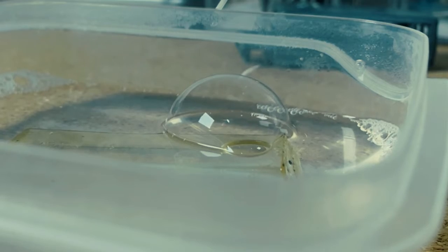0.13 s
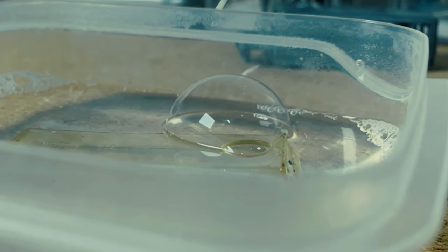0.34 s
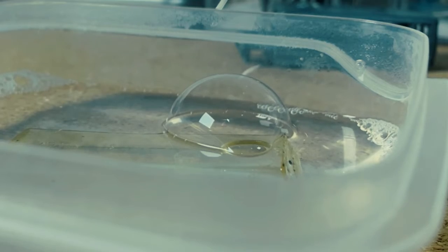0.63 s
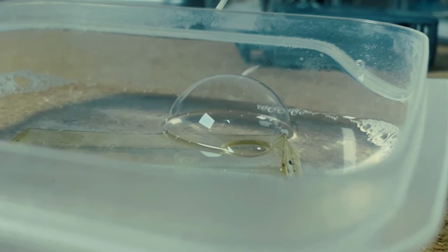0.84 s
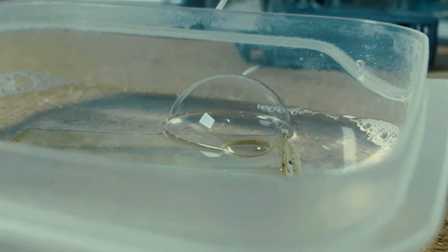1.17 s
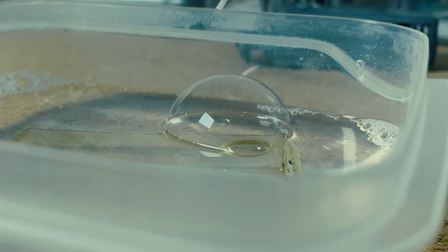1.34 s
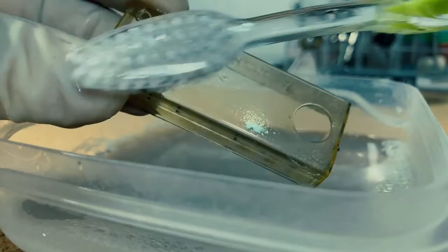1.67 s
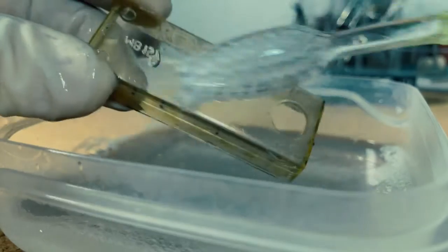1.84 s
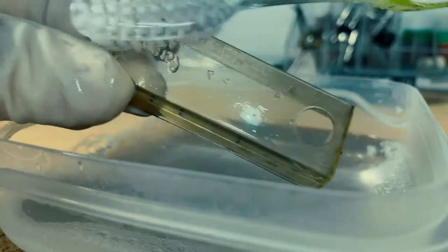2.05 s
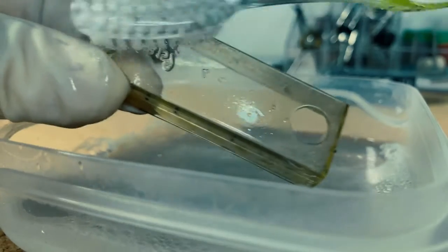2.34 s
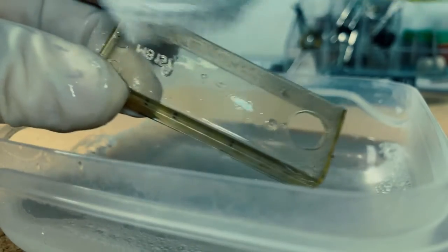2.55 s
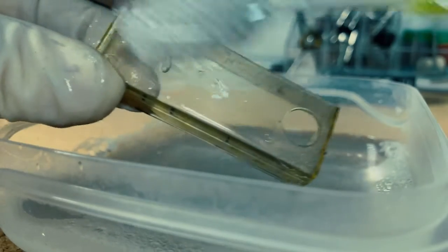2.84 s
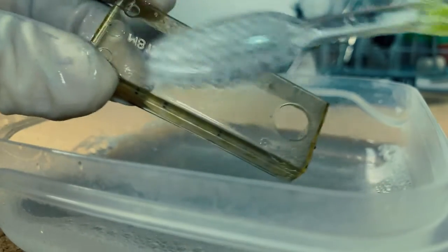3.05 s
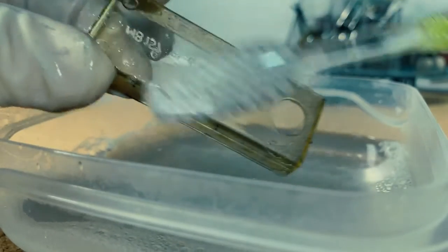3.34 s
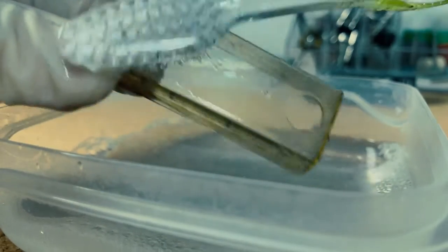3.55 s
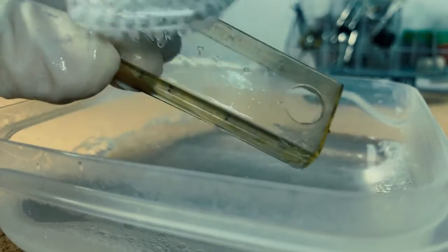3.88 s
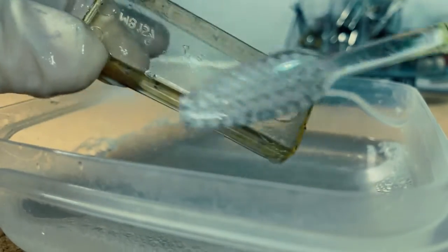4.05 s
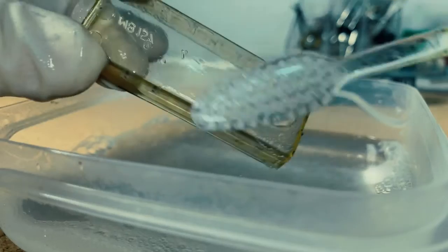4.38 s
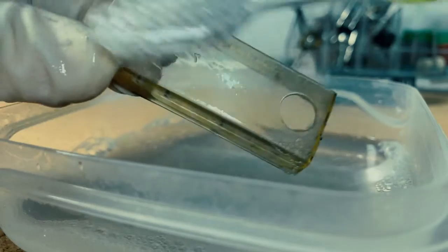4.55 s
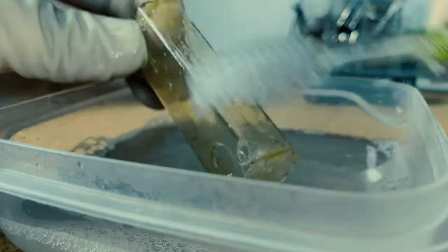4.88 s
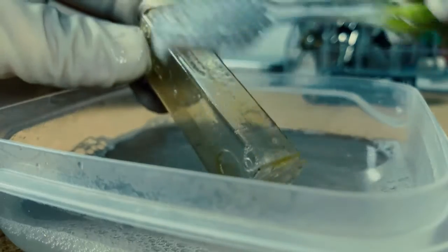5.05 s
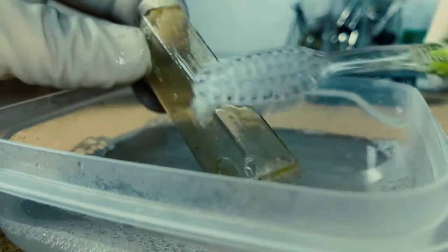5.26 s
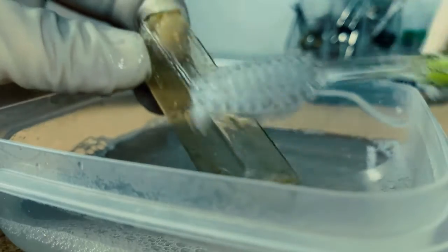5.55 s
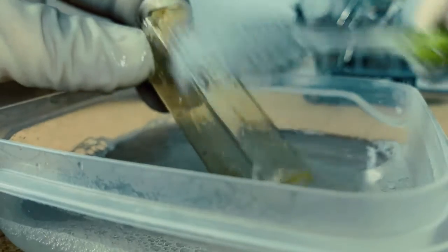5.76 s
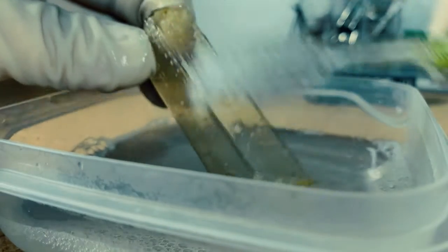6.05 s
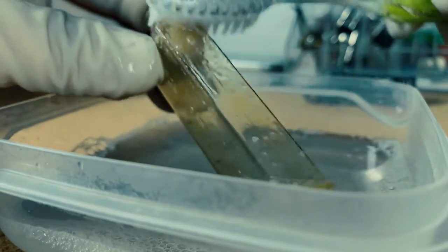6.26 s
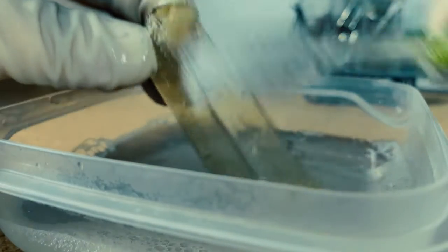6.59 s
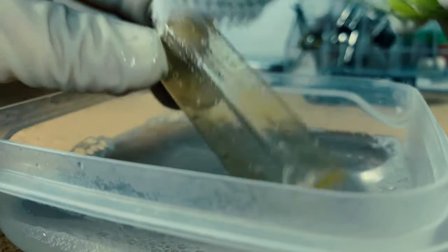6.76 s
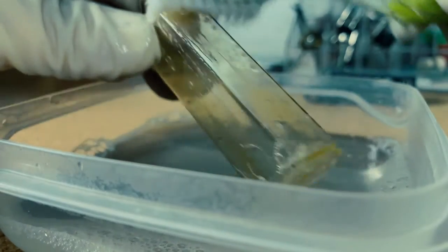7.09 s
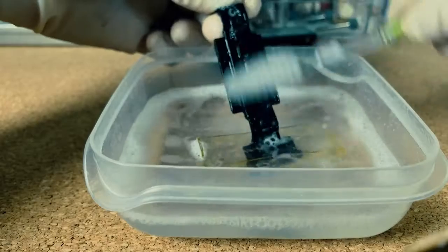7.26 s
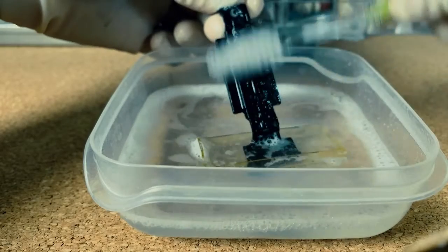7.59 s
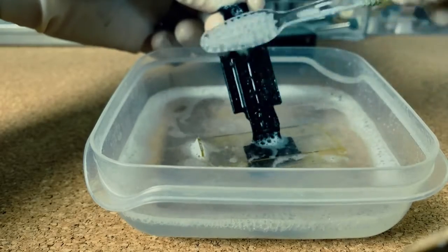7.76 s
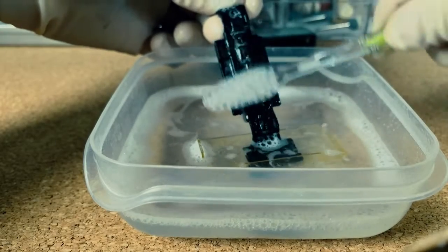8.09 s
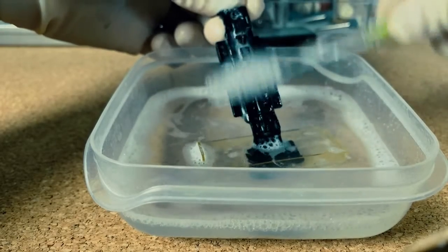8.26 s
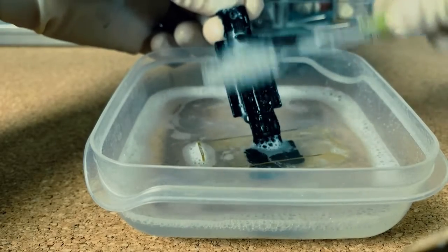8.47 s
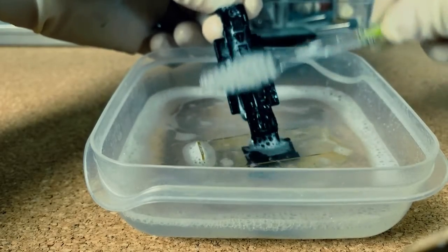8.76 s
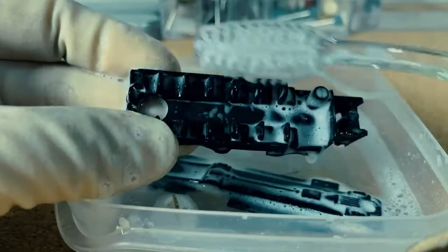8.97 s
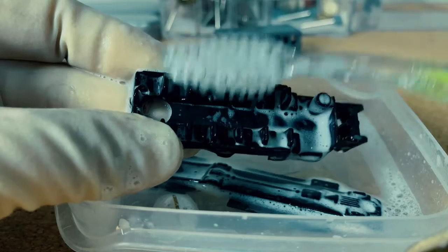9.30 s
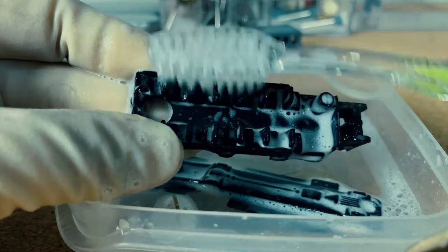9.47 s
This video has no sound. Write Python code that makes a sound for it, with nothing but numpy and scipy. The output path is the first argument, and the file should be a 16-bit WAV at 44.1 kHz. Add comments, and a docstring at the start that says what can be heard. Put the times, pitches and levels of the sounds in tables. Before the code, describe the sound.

From 0 to 1.7 s there is only a quiet low room hum, slight hiss and faint plastic stirs, close to a tub on a table. At 1.7 s a wet toothbrush lands on soapy plastic and scrubs in quick alternating strokes, about six or seven a second, a bright grainy hiss with a fizz of foam. Small plastic judders and low tub and table rumble accompany it, with a sharp snap near 4.1 s and a click around 4.6 s. From 4.9 s, on a narrow edge, strokes are louder, crisper and clearly separated, with snaps near 5.5, 6 and 6.9 s. From 7.3 s they become shorter, quicker and softer on a black part, alternating in strength. Around 8.85 s a knock marks the brush lifting; a brief gap follows. From 9.1 s slower, peaked strokes pick over ribs, with a snap at 9.4 s.

```python
"""Quiet room, the microphone close to a tub of water on a table. A low hum and faint stirs come first.
At 1.7 s a toothbrush lands on a soapy clear plastic part: flat face, then narrow edge from 4.9 s, then a black part
from 7.3 s. It lifts at 8.9 s, and from 9.1 s picks slowly at the black ribs. Each stroke is a swarm of flicking wet
bristles, filtered by the surface. Tufts snap over edges, the part judders on the tub, and tub and table shake below.
Left and right differ in phase and likeness from band to band, as in a widened stereo image."""
import sys
import numpy as np
from scipy import signal
from scipy.fft import rfft, irfft, next_fast_len
from scipy.io import wavfile
from scipy.ndimage import uniform_filter1d

SR = 44100
rng = np.random.default_rng(int(sys.argv[2]) if len(sys.argv) > 2 else 0)


def dump(signal):
    """Clip the signal to [-1, 1] and save it as 16-bit WAV at the path in sys.argv[1]."""
    limited = np.clip(np.atleast_2d(signal).T, -1, 1)
    pcm = np.round(limited * 32767).astype(np.int16)
    wavfile.write(sys.argv[1], SR, pcm)


N = 424683
EDGE_HZ = 15800  # upper limit of the sound
LAND_S, LIFT_S, RETURN_S = 1.664, 8.912, 9.143  # the brush touches down, lifts off and touches down again
SIZE = next_fast_len(N + SR // 4)  # padded, so that filtering does not wrap around
TIME, BINS = np.arange(N) / SR, np.fft.rfftfreq(SIZE, 1 / SR)


def gain_of(db):
    """Decibels to amplitude factor."""
    return 10 ** (np.asarray(db) / 20)


def evened(x):
    """Scales to unit RMS."""
    return x / np.sqrt(np.mean(x ** 2) + 1e-20)


def read(points, hz):
    """Reads a spectrum table, interpolating along log frequency."""
    f, value = np.transpose(points)
    return np.interp(np.log(hz + 1), np.log(f + 1), value)


def add(mix, s, sound):
    """Adds a sound to the mix from s seconds on, cut at the end of the mix."""
    part = mix[:, round(s * SR):][:, :sound.shape[1]]
    part += sound[:, :part.shape[1]]


def spectrum_of(x):
    """Sound to padded spectrum."""
    return rfft(x, SIZE)


def sound_of(z):
    """Spectrum back to sound."""
    return irfft(z, SIZE)[..., :N]


def wander(rate_hz):
    """Smooth random curve of unit RMS, with little change faster than rate_hz."""
    return evened(sound_of(spectrum_of(rng.standard_normal(N)) / (1 + (BINS / rate_hz) ** 4)))


def coloured(points):
    """Two unrelated noises with the given spectrum, at unit RMS."""
    return evened(sound_of(spectrum_of(rng.standard_normal((2, N))) * gain_of(read(points, BINS))))


def echoes(x, t60, db):
    """Adds a dense train of dying reflections, roughly keeping the power."""
    t = np.arange(SR // 3) / SR
    tail = rng.standard_normal(len(t)) * gain_of(-60 * t / t60) * (t > .001)
    wet = signal.oaconvolve(x, tail[None] / np.linalg.norm(tail), axes=1)[:, :N]
    return (x + gain_of(db) * wet) / np.hypot(1, gain_of(db))


# Colour of the faint hiss. Each row: frequency in Hz, relative level in dB per Hz.
AIR_COLOUR = [(200, -10), (700, 4.5), (1400, -2.5), (2500, -5.5), (5000, -8.5), (9000, -18.5),
              (12000, -4.5), (15500, -17)]


def air(air_db=-81):
    """Faint steady hiss, unrelated between left and right."""
    return gain_of(air_db) * coloured(AIR_COLOUR)


# Colour of the quiet room. Each row: frequency in Hz, relative level in dB per Hz.
HUM_COLOUR = [(20, -21.5), (40, -6.5), (52, 6), (68, -6.5), (86, -21.5), (118, -0.5), (160, -4), (220, -15),
              (450, -28.5), (1000, -47.5)]


def room(hum_db=-61, swell_db=1.5, swell_hz=6):
    """A low hum, noise in narrow humps, that swells and sinks at random."""
    return gain_of(hum_db + swell_db * wander(swell_hz)) * coloured(HUM_COLOUR)


def rumble(curve, spectrum, offset_db):
    """Low coloured noise that follows a level curve and sets in when the brush lands."""
    onset = np.clip((TIME - LAND_S) / 0.021, 0, 1)
    return gain_of(offset_db + np.interp(TIME, *np.transpose(curve))) * onset * coloured(spectrum)


# Deep heave of the table under the arm. Each row: time in seconds, level in dB before jolts and unsteadiness.
HEAVE = [(1.7, -60), (2.38, -44), (2.51, -50), (3.31, -43), (4.57, -51.5), (4.74, -40.5), (4.85, -56.5),
         (5.96, -48.5), (7.77, -61.5), (9.62, -58.5)]
# Colour of the table. Each row: frequency in Hz, relative level in dB per Hz.
TABLE_COLOUR = [(15, -33), (25, -17), (40, -4), (52, 3.5), (66, -5), (90, -11.5), (200, -40.5)]
# Shaking of the tub under the hands. Each row: time in seconds, level in dB before drag and unsteadiness.
SHAKE = [(1.7, -49), (1.72, -47.5), (4.72, -47), (4.94, -51), (6.59, -50), (8.78, -54.5), (8.87, -44.5),
         (8.94, -57), (9.62, -53)]
# Colour of the tub. Each row: frequency in Hz, relative level in dB per Hz.
TUB_COLOUR = [(50, -22.5), (85, -6.5), (105, -8.5), (120, 2), (132, -4.5), (145, 1.5), (178, -8),
              (200, -6.5), (240, -12.5), (330, -14.5), (450, -26), (700, -26), (1500, -41)]


def shaking(speed, jolt_db=3, drag_db=3, uneven_db=1.5, uneven_hz=9):
    """The arm jolts the table at each turn; brush drag shakes the tub in mid-stroke; the hands are unsteady."""
    swing = speed - speed.mean()
    unsteady = gain_of(uneven_db * wander(uneven_hz))
    table = rumble(HEAVE, TABLE_COLOUR, -jolt_db * swing)
    tub = rumble(SHAKE, TUB_COLOUR, drag_db * swing)
    return unsteady * (table + tub)


# Plastic stirs, judders and knocks against the tub, close to the microphone.
# Each row: start in seconds, level in dB before the fades, centre in Hz, length in seconds.
JUDDERS = [(0.01, -70, 372, 0.17), (0.463, -78, 480, 0.11), (2.011, -48.5, 596, .09),
           (2.157, -51.5, 440, 0.36), (2.346, -49.5, 437, 0.59), (2.974, -45.5, 470, 0.08),
           (3.216, -52, 547, .064), (3.413, -51, 593, .074), (3.858, -50, 526, .12),
           (4.289, -49.5, 470, 0.19), (4.627, -38.5, 1754, 0.0062), (5.004, -47.5, 850, .2),
           (5.36, -52, 660, .12), (5.636, -46.5, 695, .13), (6.128, -39, 470, .05),
           (6.348, -47.5, 796, .11), (6.791, -44, 330, .05), (7.687, -49, 347, 0.037),
           (8.84, -47.5, 170, 0.051), (8.844, -38, 1157, .018), (8.846, -39.5, 520, .022),
           (9.385, -52.5, 840, .05)]


def judders(slips_per_s=420, width=0.48, rub=0.093, rise=0.13):
    """Uneven slips of the part knock on the tub's broad, quickly damped resonance."""
    out = np.zeros((2, N))
    for s, db, hz, length in JUDDERS:
        u = np.linspace(0, 1, round(length * SR))
        slips = (rng.random(len(u)) < slips_per_s / SR) + rub  # sparse slips over a steady rub
        band = signal.butter(2, [hz / (1 + width), hz * (1 + width)], "band", fs=SR, output="sos")
        knocks = evened(signal.sosfilt(band, slips * rng.standard_normal((2, len(u)))))
        fade = np.sin(np.pi * np.interp(u, [0, rise, 1], [0, .5, 1]))  # quick rise, slow fall
        add(out, s, gain_of(db) * knocks * fade)
    return out


# The hand's strokes, push and pull in turn; the -60 dB one is in the air.
# Each row: turn of the brush in seconds, hiss in dB at top speed before catching and filtering.
STROKES = [(1.65, -34.5), (1.761, -29), (1.909, -28), (2.08, -29), (2.247, -28), (2.372, -29), (2.535, -28),
           (2.665, -30), (2.824, -26), (2.98, -27), (3.127, -27.5), (3.272, -26.5), (3.427, -32),
           (3.608, -31), (3.753, -29), (3.904, -28), (4.082, -31), (4.244, -31), (4.456, -30), (4.649, -30),
           (4.855, -28.5), (4.996, -22.5), (5.162, -26), (5.3, -24.5), (5.456, -26.5), (5.589, -22),
           (5.734, -23), (5.876, -23.5), (6.017, -23.5), (6.155, -22), (6.296, -21.5), (6.432, -22),
           (6.57, -23), (6.694, -22), (6.842, -21.5), (6.982, -21.5), (7.119, -22), (7.23, -38.5),
           (7.302, -28.5), (7.423, -29.5), (7.524, -27), (7.648, -29), (7.755, -24.5), (7.851, -31),
           (7.97, -26.5), (8.079, -28.5), (8.176, -25), (8.284, -28.5), (8.393, -26.5), (8.509, -28.5),
           (8.612, -25), (8.72, -30), (8.802, -32.5), (8.918, -60), (9.135, -28), (9.312, -26), (9.5, -30),
           (9.72, -40)]
# How the hand scrubs: flat on the face, full stops along the edge, short and quick on black, slow at the ribs.
# Each row: start in seconds, dip before a push in dB, dip before a pull in dB, place of top speed in a push (0-1),
# the same in a pull (0-1), peakedness (exponent), ring of the part in dB before pressing and slowing change it.
GRIPS = [(1.6, -4.5, -17, 0.62, 0.37, 1.97, 1.5), (2.65, -17, -19, 0.36, 0.51, 1.27, 0.7),
         (3.42, -19.5, -16.5, 0.38, 0.41, 1.64, 4), (4.85, -31.5, -29.5, 0.45, 0.46, 1.5, 2.5),
         (5.72, -24, -26.5, .45, .52, 2.7, 0.5), (6.42, -16.5, -21, 0.53, .5, 2.16, 0),
         (7.28, -18.5, -18, 0.54, 0.49, 2.28, 1.5), (9.1, -17, -20.5, 0.57, 0.44, 6.1, .5)]


def strokes():
    """Each stroke takes its shape from the grip; its force is its level against the other strokes of that grip."""
    turn, top_db = np.transpose(STROKES)
    grip = np.searchsorted([row[0] for row in GRIPS], turn, "right") - 1
    _, push_db, pull_db, push_crest, pull_crest, peaked, ring_db = np.array(GRIPS)[grip].T
    pull = np.arange(len(turn)) % 2
    louder_db = np.maximum(top_db, np.roll(top_db, 1))  # of the two strokes that meet at a turn
    turn_db = louder_db + np.where(pull, pull_db, push_db)
    force_db = top_db - np.array([np.median(top_db[grip == g]) for g in grip])
    crest = np.where(pull, pull_crest, push_crest)
    return turn, turn_db, top_db, crest, peaked, ring_db, np.clip(force_db, -4, 4)


def touching(settle_s=0.019):
    """1 while the bristles are on the part, 0 while the brush is in the air."""
    return np.clip((TIME - LAND_S) / settle_s, 0, 1) * ((TIME < LIFT_S) | (TIME > RETURN_S))


def brush_motion(stick_s=0.021, stick_db=-1.0, release_db=2, release_s=0.017,
                 damping=0.34, slow_ring_db=1.5, flatten=1.17):
    """Speed, hiss level, ring. Bristles stick and bend at each turn, then spring free; pressing damps the ring."""
    turn, turn_db, top_db, crest, peaked, ring_db, force_db = strokes()
    top = turn + crest * np.diff(turn, append=turn[-1] + 1)
    # Travel is a whole number at each turn and a half at each top speed.
    travel = np.interp(TIME, np.column_stack([turn, top]).ravel(), np.arange(2 * len(turn)) / 2)
    k = travel.astype(int)  # stroke under way
    speed = abs(np.sin(np.pi * travel)) ** peaked[k]
    speed = np.tanh(flatten * speed) / np.tanh(flatten)  # the hand levels off in mid-stroke
    level = (1 - speed) * gain_of(np.interp(TIME, turn, turn_db)) + speed * gain_of(top_db[k])

    free_s = TIME - turn[k] - stick_s
    sticking_db = stick_db * (1 + free_s / stick_s)
    springing_db = release_db * np.exp(-abs(free_s) / release_s)
    catch_db = np.where(free_s < 0, sticking_db, springing_db)
    catch_db = uniform_filter1d(catch_db * (TIME > turn[0]), size=SR // 250)  # not all bristles at once

    ring = gain_of(ring_db[k] - damping * force_db[k] + slow_ring_db * (1 - speed))
    return speed, level * gain_of(catch_db) * touching(), uniform_filter1d(ring, size=900)


def bristles(level, per_s=16000, full_db=-28, spread_db=2.0, tuft_db=0.88, tufts_per_s=240, tuft_s=0.0034,
             foam=0.44):
    """Single bristles flick, more at speed, bunched into tufts that let go at once, over the fizz of the foam."""
    density = per_s / SR * np.sqrt(np.minimum(level / gain_of(full_db), 1)) + 1 / SR  # flicks a sample
    size = gain_of(spread_db * np.minimum(rng.exponential(1, N), 5))
    flicks = size * (rng.random(N) < density) / np.sqrt(density)
    flicks /= np.sqrt(np.average(flicks ** 2, weights=level ** 2))
    releases = 1. * (rng.random(N) < tufts_per_s / SR)
    pile = signal.lfilter([1], [1, -np.exp(-1 / (tuft_s * SR))], releases)
    pile = uniform_filter1d(pile, size=SR // 600)  # the bristles of a tuft leave a little apart
    tufts = evened(gain_of(tuft_db * np.minimum(evened(pile - pile.mean()), 2)))
    grain = np.hypot(flicks, foam) / np.hypot(1, foam)
    return level * tufts * grain * rng.standard_normal((2, N))


def ring_band(x, low_hz=1700, high_hz=4800):
    """The band in which the plastic rings."""
    return signal.sosfiltfilt(signal.butter(2, [low_hz, high_hz], "band", fs=SR, output="sos"), x)


# Tufts snapping over an edge of the part.
# Each row: start in seconds, level in dB before filtering, fall by 60 dB in seconds, gain of the ring band in dB.
SNAPS = [(1.785, -20.5, .04, 8), (2.626, -31, .024, -20), (3.636, -25, .027, -2), (4.093, -34, 0.027, -10),
         (4.1168, -12.5, .012, 2.5), (5.492, -18, 0.12, -7), (5.953, -14, .018, -9),
         (5.9772, -13.5, .0083, -14), (6.866, -20, .015, 0), (6.894, -17, 0.035, 6), (7.143, -20, .023, -8),
         (7.678, -22.5, .035, -13), (8.003, -26, .08, 6), (8.056, -22, .012, -14), (8.325, -29, .023, -10),
         (9.145, -44, 0.022, 6), (9.4, -18, 0.059, 1)]


def snaps(low_hz=2400):
    """Sharp, thin, fast-dying noise bursts as a whole tuft lets go."""
    out = np.zeros((2, N))
    t = np.arange(SR // 20) / SR
    for s, db, t60, ring_db in SNAPS:
        burst = gain_of(db - 60 * t / t60) * rng.standard_normal((2, len(t)))
        add(out, s, burst + (gain_of(ring_db) - 1) * ring_band(burst))
    return signal.sosfilt(signal.butter(2, low_hz, "high", fs=SR, output="sos"), out)


def shifting(x, patchy_db, size):
    """The contact point moves, so patches of the spectrum (size: bins, frames) swell and fade."""
    z = signal.stft(x, nperseg=512, noverlap=384)[2]
    patches = uniform_filter1d(rng.standard_normal(z.shape[1:]), size[0], 0)
    patches = uniform_filter1d(patches, size[1], 1)
    patchy = z * evened(gain_of(patchy_db * evened(patches)))
    return signal.istft(patchy, nperseg=512, noverlap=384)[1][:, :N]


# Colour of the bristles on the flat face and narrow edge of the clear part, then on the side of the black part,
# standing in the tub, and on its ribs. Each row: frequency in Hz, relative level in dB per Hz.
CLEAR_FACE = [(340, -19), (600, -29.5), (1250, -26.5), (1800, -10.5), (2300, -6.5), (2650, -22),
              (3150, -16), (3550, -3.5), (4400, -10), (5800, -9.5), (7200, -2.5), (9200, 1), (12900, -2.5),
              (15600, -2)]
CLEAR_EDGE = [(340, -14.5), (560, -21.5), (1100, -16.5), (1600, -15.5), (2450, -10), (2750, -23.5),
              (3500, -5), (4300, -13), (5800, -13), (7000, -5), (9000, -1), (11500, 1.5), (12700, -3),
              (15500, -0.5)]
BLACK_SIDE = [(340, -8.5), (540, -14.5), (1300, -8), (2200, -19), (2650, -29.5), (3200, -20), (4000, -8.5),
              (5000, -13.5), (6100, -12.5), (7000, -2.5), (8400, 1), (9800, -4), (12000, 1.5), (15500, 0)]
BLACK_RIBS = [(300, -15), (800, -17), (1450, -29.5), (2100, -17.5), (2800, -26.5), (3500, -19), (3900, -11),
              (5400, -11), (7400, -4.5), (8200, 6), (9500, -7), (10800, -2.5), (12300, -2), (15500, -3)]
# The surface under the brush. Each row: start in seconds, colour table of the surface.
SURFACES = [(0, CLEAR_FACE), (4.853, CLEAR_EDGE), (7.3, BLACK_SIDE), (9.0, BLACK_RIBS)]


def scrubbing(level, ring, snap_db=-0.5, low_hz=180):
    """Bristle flicks and snaps sound through whichever surface is under the brush."""
    drive = shifting(bristles(level), patchy_db=1.14, size=(12, 6))  # broad, brief patches
    drive = shifting(drive, patchy_db=3.5, size=(3, 32))  # narrow, longer patches
    drive = drive + (ring - 1) * ring_band(drive) + gain_of(snap_db) * snaps()
    surface = np.searchsorted([s for s, _ in SURFACES], TIME, "right") - 1
    treble = (BINS > 3000) & (BINS < EDGE_HZ)
    out = np.zeros((2, N))
    for k, (_, spectrum) in enumerate(SURFACES):
        colour = gain_of(read(spectrum, BINS)) * BINS ** 4 / (BINS ** 4 + low_hz ** 4)
        colour /= np.sqrt(np.mean((colour * treble) ** 2))  # surfaces matched in the treble
        contact = sound_of(spectrum_of(drive * (surface == k)) * colour)
        out += echoes(contact, t60=0.072, db=-8)  # the part and tub ring briefly
    return out


# How left and right differ, as in a widened stereo image.
# Each row: frequency in Hz, phase by which left leads in radians, likeness (0-1).
STEREO_IMAGE = [(0, 0, .94), (400, 0, .84), (1100, .5, .42), (1550, 3.2, .62), (2400, 5.5, .8),
                (3300, 8.3, .45), (3900, 5.9, .65), (4400, 6.8, .5), (5000, 9.4, .75), (5600, 8.6, .35),
                (5950, 6.2, .8), (6750, 6.1, .87), (7300, 4.7, .62), (8150, 3.15, .997), (8850, 3.13, .997),
                (9300, 2.4, .68), (10000, 1, .65), (10400, 0, .99), (11650, 0, .99), (12050, -1.3, .58),
                (12800, -3.13, .997), (13800, -3.15, .997), (14600, -4.6, .52), (15300, -6.28, .99)]
# Balance of left and right. Each row: frequency in Hz, left minus right in dB.
BALANCE = [(0, 0), (900, 3), (1500, 0), (2100, 2), (3100, -2.5), (3600, 12), (4200, -0.5), (5500, -0.5),
           (7000, 0), (8000, 0)]


def stereo(pair):
    """Blends two unrelated versions of the sound into left and right, with phase and likeness set by frequency."""
    hz, phase, likeness = np.transpose(STEREO_IMAGE)
    same = np.interp(BINS, hz, likeness)
    a, b = spectrum_of(pair)
    right = (same * a + np.sqrt(1 - same ** 2) * b) * np.exp(-1j * np.interp(BINS, hz, phase))
    lean = gain_of(np.interp(BINS, *np.transpose(BALANCE)))
    return sound_of(np.array([a * lean, right]) * np.sqrt(2 / (1 + lean ** 2)))  # keeps the summed power


def scene():
    """The motion of the brush drives both hiss and rumble, close to the microphone in a quiet room."""
    speed, level, ring = brush_motion()
    near = echoes(scrubbing(level, ring) + judders(), t60=0.29, db=-33.0)  # faint longer reflections
    return stereo(near + shaking(speed) + room()) + air()


def record(dry):
    """A steep band limit, a long low-pass filter."""
    return signal.oaconvolve(dry, signal.firwin(511, EDGE_HZ, window=("kaiser", 9), fs=SR)[None], "same")


dry = scene()
out = record(dry)
dump(out)
```